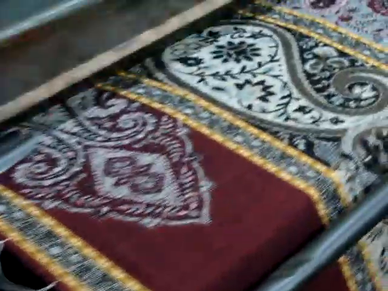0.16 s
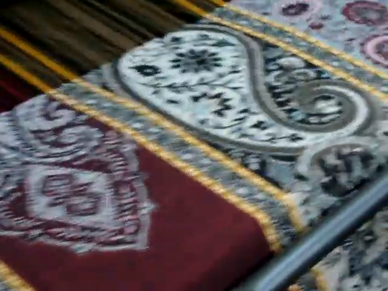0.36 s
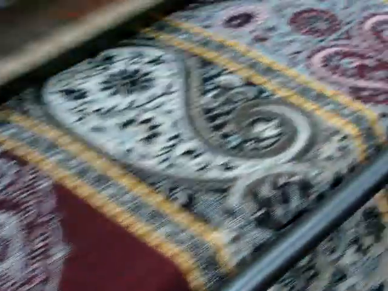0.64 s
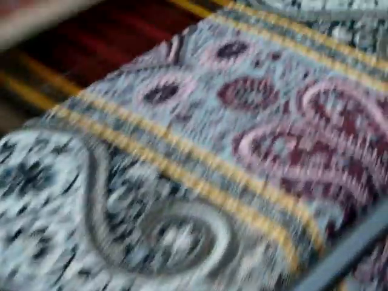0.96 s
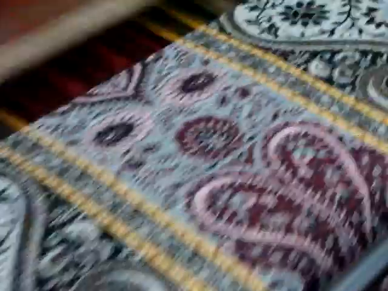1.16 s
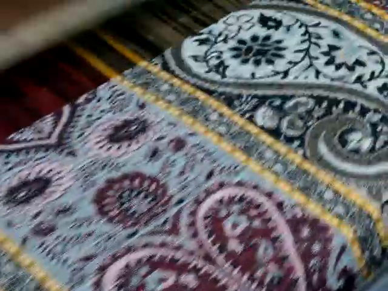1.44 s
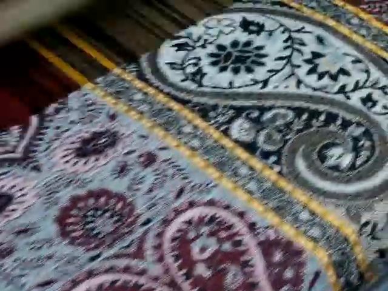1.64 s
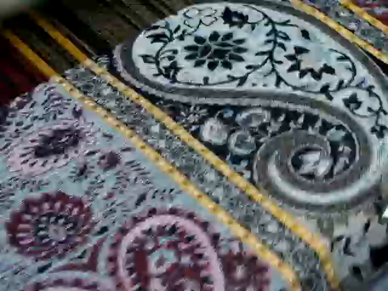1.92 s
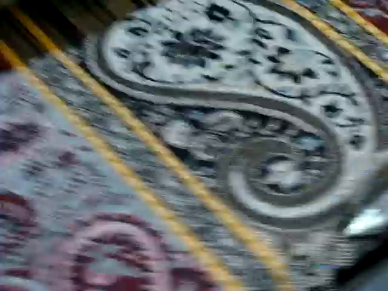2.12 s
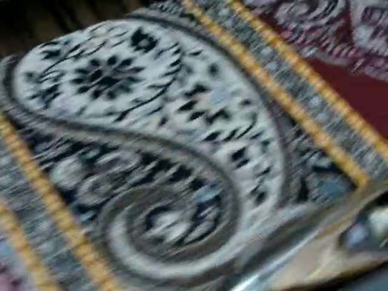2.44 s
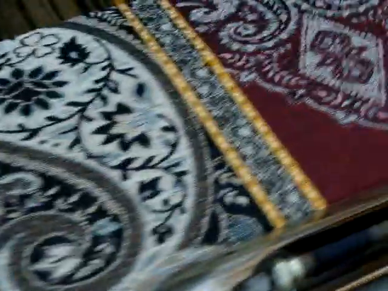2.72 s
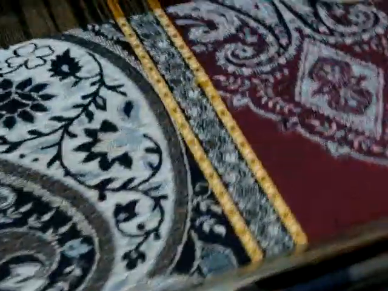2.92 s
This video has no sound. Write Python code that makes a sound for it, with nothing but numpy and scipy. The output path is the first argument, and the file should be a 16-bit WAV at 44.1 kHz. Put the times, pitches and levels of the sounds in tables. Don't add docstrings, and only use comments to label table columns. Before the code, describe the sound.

A power loom runs loudly throughout, close to one small microphone. Dense steel clatter surges roughly four times a second, already rattling at the start. Short, sharp knocks cut through in uneven clusters, strongest near 1.0, 1.36, 2.0, 2.3 and 2.9 seconds, with faint low thuds. Other looms blur into constant roar; walls return the knocks. Peaks sound squashed, level dips after heavy blows, treble is patchy and dull on top.

```python
import sys
import numpy as np
from scipy import signal
from scipy.io import wavfile
from scipy.ndimage import uniform_filter1d, minimum_filter1d

SR = 44100
rng = np.random.default_rng(int(sys.argv[2]) if len(sys.argv) > 2 else 0)


def amplitude_ratio(level_db):
    exponent = np.asarray(level_db, float) / 20
    return 10 ** exponent


def persist_wave(psi):
    counts = np.round(np.clip(psi, -1, 1) * 32767).astype(np.int16)
    wavfile.write(sys.argv[1], SR, np.atleast_2d(counts).T)


N = 135828
TOP_HZ = 10300

# pitch_hz, density_db_per_hz
ROAR_SPECTRUM = [(25, -48), (90, -20), (250, -6), (630, -0.5), (2500, -0.5), (5500, -5), (8000, -13),
                 (10500, -19)]
# start_s, peak_db
FRAME_PUSHES = [(0.339, -49), (0.409, -41.5), (0.609, -46.5), (0.809, -44), (0.999, -48), (1.059, -48),
                (1.269, -50), (1.359, -45.5), (1.569, -49), (1.759, -47.5), (1.929, -44.5), (1.999, -51),
                (2.309, -36.5), (2.519, -49), (2.879, -44.5), (2.97, -45)]
# start_s, peak_db, ring_hz
KNOCKS = [(0.0607, -4.5, 1710), (0.079, -5, 2550), (0.0975, -4.5, 4020), (0.3348, -5, 1720),
          (0.4075, -3.5, 1870), (0.5871, -5.5, 3540), (0.6142, -4.5, 1310), (0.7403, -5.5, 4160),
          (0.8075, -4, 2830), (1.0006, -2, 4270), (1.0086, -3.5, 2430), (1.051, -6, 3010),
          (1.0582, -3, 4620), (1.273, -3.5, 1780), (1.3605, -2, 4330), (1.5694, -4, 1650),
          (1.6916, -7, 4180), (1.7614, -4.5, 4170), (1.9045, -3, 3280), (1.932, -5, 4500),
          (1.954, -4, 4000), (2.0011, -1, 5100), (2.0209, -3.5, 3740), (2.2079, -5, 1460),
          (2.2463, -5, 1185), (2.314, -2.5, 4560), (2.5214, -4.5, 3470), (2.6133, -6.5, 3230),
          (2.8841, -1.5, 3820), (2.965, -1.5, 1520)]
# start_s, rise_s, hold_s, level_db, brightness_db_per_octave
SURGES = [(0.057, 0.017, 0.048, -18, 0.3), (0.279, 0.062, 0.089, -16, -1.2),
          (0.486, 0.05, 0.078, -14.5, -0.9), (0.743, 0.0053, 0.013, -14, -0.5),
          (0.784, 0.035, 0.02, -13.5, -0.9), (0.942, 0.017, 0.089, -26.5, 2.3),
          (1.026, 0.0028, 0.022, -19.5, -0.5), (1.223, 0.064, .07, -16.5, -1.5),
          (1.424, 0.096, 0.082, -14.5, -0.9), (1.682, 0.0054, 0.049, -16.5, -0.4),
          (1.72, 0.047, 0.078, -13, -2.15), (1.926, 0.0031, 0.039, -14.5, -1.4),
          (1.947, 0.005, 0.01, -18, 0.2), (2.187, .01, 0.16, -16.5, -2.14),
          (2.342, 0.14, 0.045, -14.5, -1.64), (2.609, 0.0055, 0.016, -16.5, -0.8),
          (2.644, 0.032, 0.13, -13.5, -1.86), (2.85, 0.013, 0.013, -15.5, -0.8),
          (2.942, 0.0027, 0.0073, -14.5, 0), (-.05, .01, .07, -25.5, 0.8), (0.86, 0.0091, 0.014, -23.5, -1),
          (1.022, 0.0023, 0.01, -23, -0.5), (1.381, 0.018, 0.011, -20.5, 0),
          (2.284, 0.014, 0.0096, -20, 1.5)]
# pitch_hz, density_db_per_hz
CLATTER_SPECTRUM = [(150, -27), (650, -9), (1300, -5), (3500, -2), (6000, -2.5), (7800, -8), (8800, -17),
                    (10500, -32)]
# start_s, depth_db
GAIN_DUCKS = [
    (0.411, 2),
    (1.069, 1.5),
    (1.277, 3),
    (1.371, 4),
    (1.934, 4.5),
    (2.318, 6),
    (2.888, 3),
    (2.982, 6),
]


def rms_one(x):
    return x / np.sqrt(np.mean(x ** 2) + 1e-20)


def at_hz(spectrum, hz):
    points_hz, points_db = np.array(spectrum).T
    return np.interp(np.log(hz), np.log(points_hz), points_db)


def drift(rate_hz):
    pole = np.exp(-80 * np.pi * rate_hz / SR)
    white = rng.standard_normal(N // 40 + 2002)
    slow = signal.lfilter([1], [1, -2 * pole, pole * pole], white)[2000:]
    return np.interp(np.arange(N) / 40, np.arange(len(slow)), rms_one(slow))


def third_octave(x, hz):
    edges_hz = [hz * 2 ** (-1 / 6), hz * 2 ** (1 / 6)]
    return signal.sosfilt(signal.butter(2, edges_hz, "band", fs=SR, output="sos"), x)


def roar():
    level_db, flicker_db, settle = -23, 0.46, 8000
    together = drift(5)
    white = rng.standard_normal((2, N + settle))
    out = 0
    for k, hz in enumerate(25 * 2 ** np.arange(0, 9.1, 1 / 3)):
        flicker = 0.63 * together + drift(10)
        gain = amplitude_ratio(at_hz(ROAR_SPECTRUM, hz) + flicker_db * flicker)
        out = out + gain * third_octave(white[k % 2], hz)[-N:]
    return amplitude_ratio(level_db) * rms_one(out)


def shed(x):
    t60_s, wall_cut_hz = 0.98, 2600
    dull = np.exp(-2 * np.pi * wall_cut_hz / SR)
    lags = (np.geomspace(0.019, 0.053, 8) * SR).astype(int)
    out = np.zeros(N)
    for k, lag in enumerate(lags):
        loop, state = x.copy(), [0.0]
        gain = amplitude_ratio(-60 * lag / SR / t60_s)
        for i in range(lag, N, lag):
            back, state = signal.lfilter([gain * (1 - dull)], [1, -dull], loop[i - lag:i], zi=state)
            loop[i:i + lag] += back[:N - i]
        out += (loop - x) * (-1) ** k
    return out


def frame_pushes():
    level_db, peak_time_s = 4, 0.0033
    start_s, peak_db = np.array(FRAME_PUSHES).T[:, :, None]
    t = np.maximum(np.arange(N) / SR - start_s, 0) / peak_time_s
    return np.sum(amplitude_ratio(peak_db + level_db) * t * np.exp(1 - t), axis=0)


def knocks():
    level_db, onset_s = -2.5, 0.001
    crack_db, crack_t60_s, crack_band_hz = -4.5, 0.029, [1190, 6470]
    ring_db, ring_t60_s, ring_dull_db_per_octave = -2.5, 0.02, 2
    t = np.arange(SR // 8) / SR
    noise = rng.standard_normal((len(KNOCKS), len(t)))
    colour = signal.butter(2, crack_band_hz, "band", fs=SR, output="sos")
    onset = np.minimum(t / onset_s, 1)
    out = np.zeros(N + SR)
    for (start_s, peak_db, hz), hiss in zip(KNOCKS, noise):
        crack = amplitude_ratio(crack_db - 60 * t / crack_t60_s) * rms_one(signal.sosfilt(colour, hiss))
        tone_db = ring_db - ring_dull_db_per_octave * np.log2(hz / 1500)
        tone = amplitude_ratio(tone_db - 60 * t / ring_t60_s) * np.sin(2 * np.pi * hz * t)
        first = int(start_s * SR)
        out[first:first + len(t)] += amplitude_ratio(peak_db + level_db) * (crack + tone) * onset
    return out[:N]


def surge_strength(hz):
    release_db_per_s, release_tilt_db_per_s_octave = 102.5, -14
    t = np.arange(0, N + 32, 32) / SR
    octaves = np.log2(hz / 2000)
    fall_db_per_s = max(release_db_per_s + release_tilt_db_per_s_octave * octaves, 10)
    power = 0
    for start_s, rise_s, hold_s, level_db, tilt_db in SURGES:
        up = np.clip((t - start_s) / max(rise_s, 1e-3), 0, 1)
        released_s = np.maximum(t - start_s - rise_s - hold_s, 0)
        power = power + (up * amplitude_ratio(level_db + tilt_db * octaves - fall_db_per_s * released_s)) ** 2
    return np.interp(np.arange(N) / SR, t, np.sqrt(power))


def ring(clicks, hz, t60_s):
    radius, angle = amplitude_ratio(-60 / (t60_s * SR)), 2 * np.pi * hz / SR
    feedback = [1, -2 * radius * np.cos(angle), radius * radius]
    return signal.lfilter([0, np.sin(angle)], feedback, clicks + 1e-18)


def clatter():
    contacts_per_s, clump_db, size_spread_db = 5000, -1.5, 3
    ring_cycles, blur_share = 8.7, 0.58
    pitches_hz = 160 * 2 ** np.arange(0, 6.4, 1 / 3)
    size_db = size_spread_db * np.minimum(rng.exponential(1, N), 5)
    sizes = amplitude_ratio(size_db) * rng.choice([-1, 1], N)
    born = rng.random(N) < contacts_per_s * amplitude_ratio(clump_db * drift(40)) / SR
    place = rng.random(N) ** 0.5 * len(pitches_hz)
    white = rng.standard_normal((2, N))
    weights = amplitude_ratio(at_hz(CLATTER_SPECTRUM, pitches_hz)) * np.sqrt(pitches_hz)
    weights = weights / np.sqrt(np.sum(weights ** 2))
    out = 0
    for k, (hz, weight) in enumerate(zip(pitches_hz, weights)):
        clicks = sizes * born * (abs(place - k - 0.5) < 1.5)
        hits = rms_one(third_octave(ring(clicks, hz, ring_cycles / hz), hz))
        blur = rms_one(third_octave(white[k % 2], hz))
        mixed = np.sqrt(1 - blur_share) * hits + np.sqrt(blur_share) * blur
        out = out + weight * surge_strength(hz) * mixed
    return out


def scene():
    shed_db = -14
    blows = knocks()
    mix = clatter() + blows + amplitude_ratio(shed_db) * shed(blows) + frame_pushes() + roar()
    return np.tile(mix, (2, 1))


def gain_control():
    attack_s, recover_db_per_s = 0.0022, 52.5
    t = np.arange(N) / SR
    duck_db = 0
    for start_s, depth_db in GAIN_DUCKS:
        attack = np.clip((t - start_s) / attack_s, 0, 1)
        left_db = np.maximum(depth_db - recover_db_per_s * np.maximum(t - start_s, 0), 0)
        duck_db = duck_db + attack * left_db
    return amplitude_ratio(-duck_db)


def treble_dropouts(x):
    lowest_hz, band_hz = 4700, 620
    under_db, chance_db, shared_chance, rise_db_per_khz = -9, 3, 0.62, 0.63
    weak_line_db, floor_db = -7.5, -32
    hz, _, z = signal.stft(x, SR, "cosine", nperseg=256, noverlap=128)
    shared = rng.standard_normal(z.shape[1])
    for low_hz in np.arange(lowest_hz, TOP_HZ, band_hz):
        rows = (hz >= low_hz) & (hz < low_hz + band_hz)
        power = np.abs(z[rows]) ** 2
        level_db = 10 * np.log10(uniform_filter1d(power.mean(axis=0), size=3) + 1e-20)
        loudest_db = -minimum_filter1d(-level_db, size=13)
        own = uniform_filter1d(rng.standard_normal(len(level_db)), size=5)
        shift_db = chance_db * rms_one(shared_chance * shared + own)
        shift_db += rise_db_per_khz * (low_hz - lowest_hz) / 1000
        kept = 1 / (1 + amplitude_ratio(40 * (loudest_db + under_db + shift_db - level_db)))
        strong = power > power.mean(axis=0) * amplitude_ratio(2 * weak_line_db)
        z[rows] *= np.maximum(kept * strong, amplitude_ratio(floor_db))
    return signal.istft(z, SR, "cosine", nperseg=256, noverlap=128)[1][:N]


def roll_off(x):
    return signal.sosfilt(signal.butter(12, 10080, fs=SR, output="sos"), x)


def record(dry):
    limit = 0.72
    x = limit * np.tanh(gain_control() * dry[0] / limit)
    x = treble_dropouts(x)
    x = signal.sosfilt(signal.butter(1, 15, "high", fs=SR, output="sos"), x)
    x = signal.sosfilt(signal.ellip(10, 0.5, 75, TOP_HZ - 250, fs=SR, output="sos"), x)
    return roll_off(np.tile(x, (2, 1)))


dry = scene()
out = record(dry)
persist_wave(out)
```